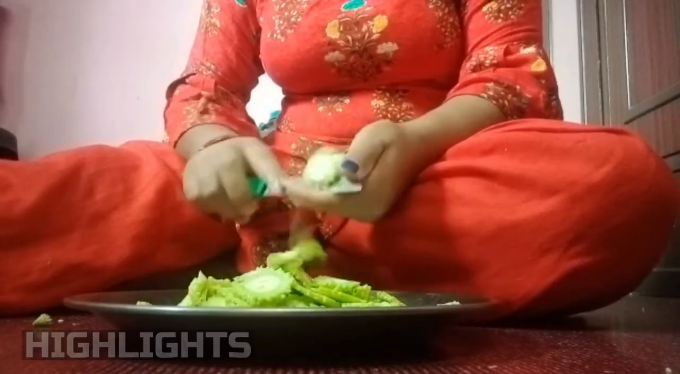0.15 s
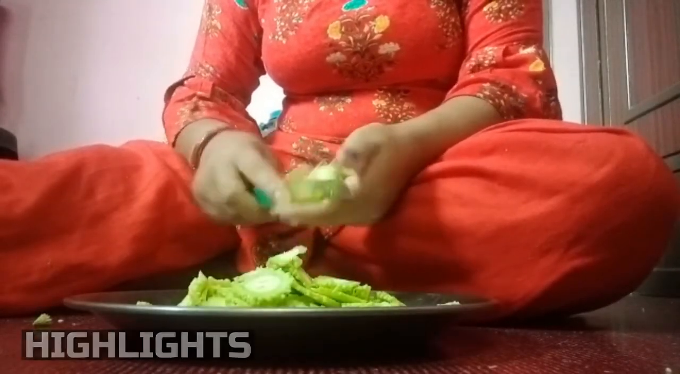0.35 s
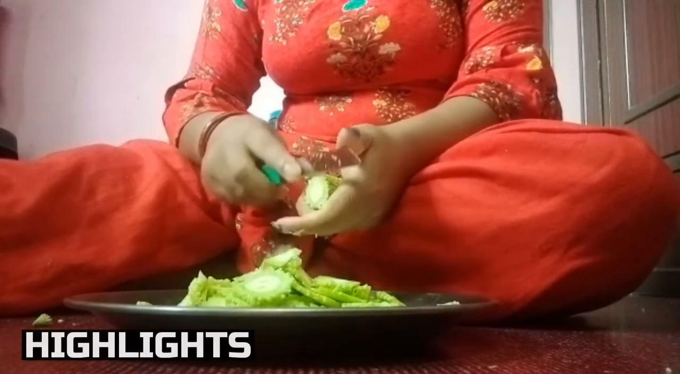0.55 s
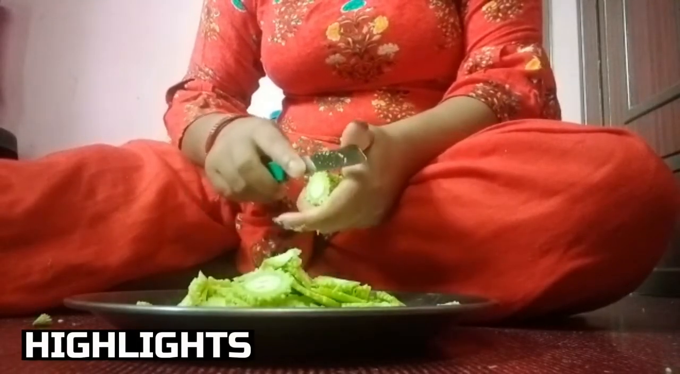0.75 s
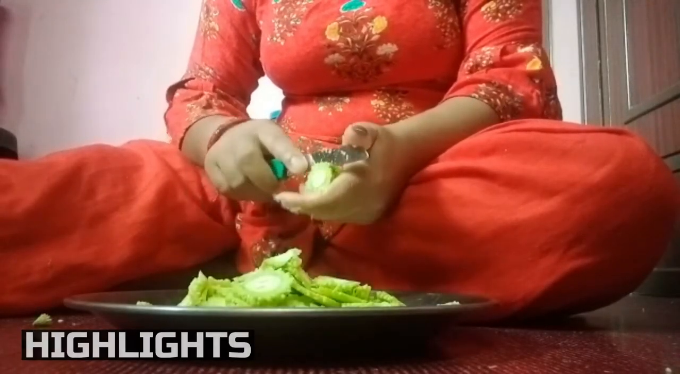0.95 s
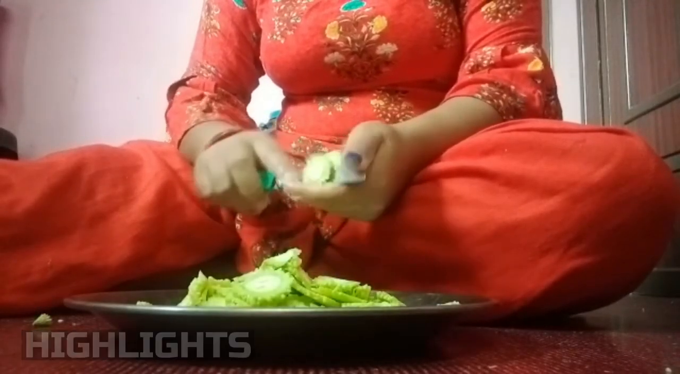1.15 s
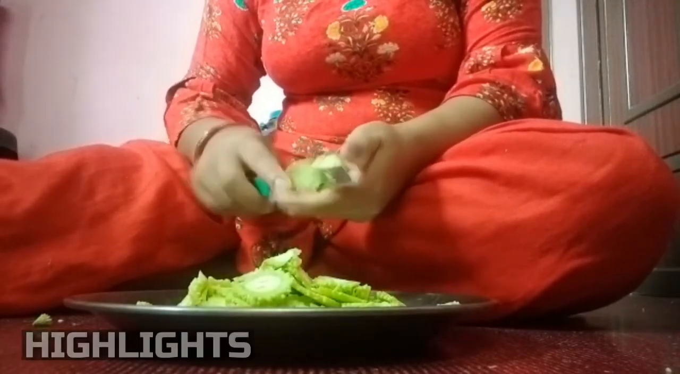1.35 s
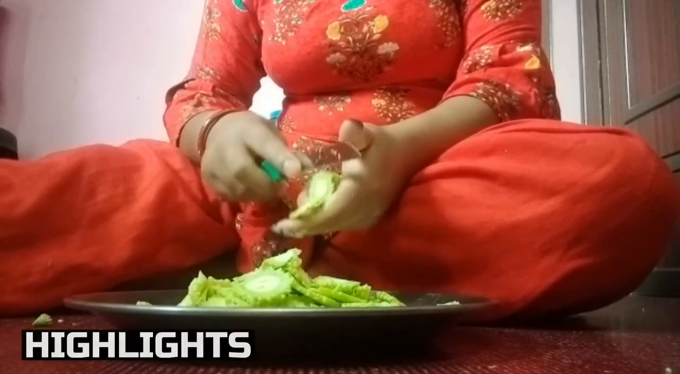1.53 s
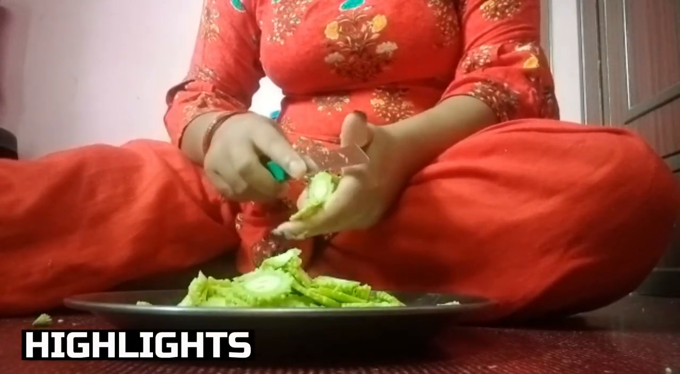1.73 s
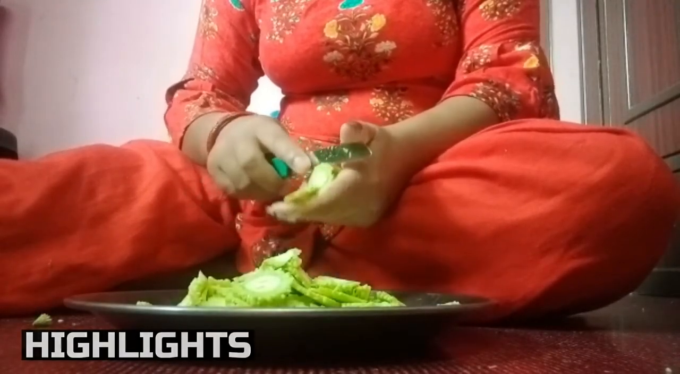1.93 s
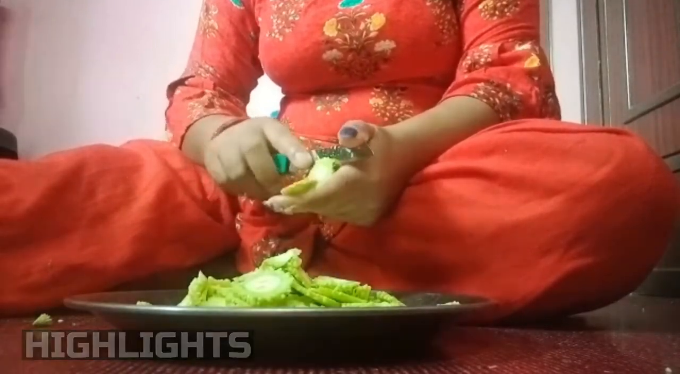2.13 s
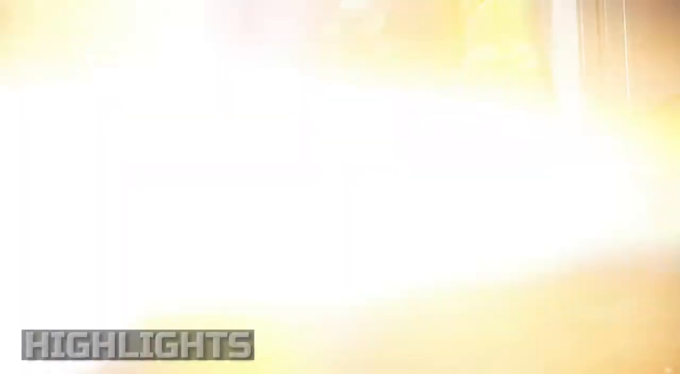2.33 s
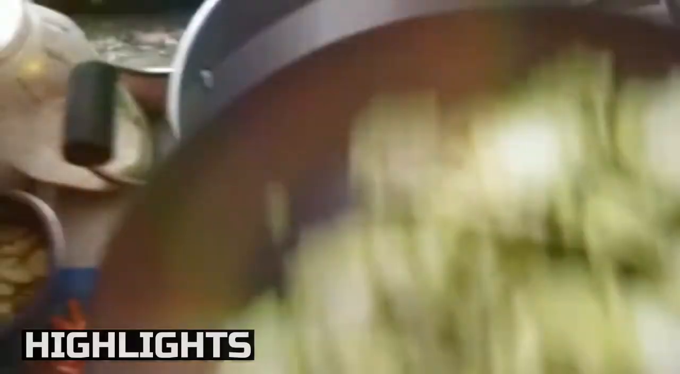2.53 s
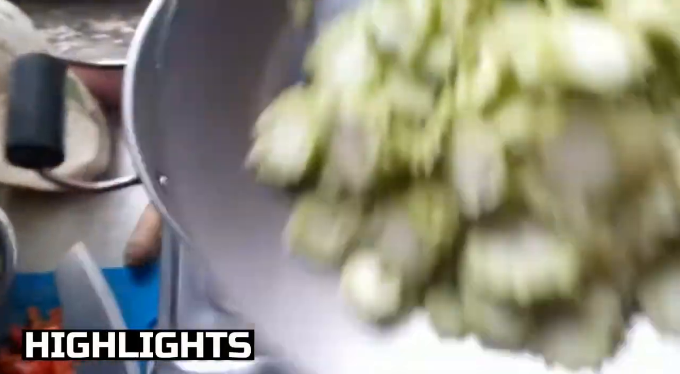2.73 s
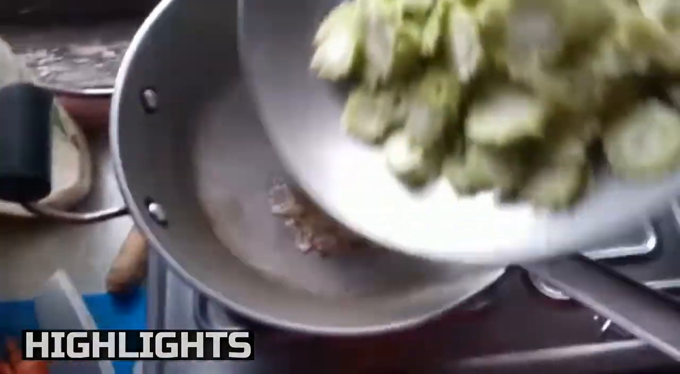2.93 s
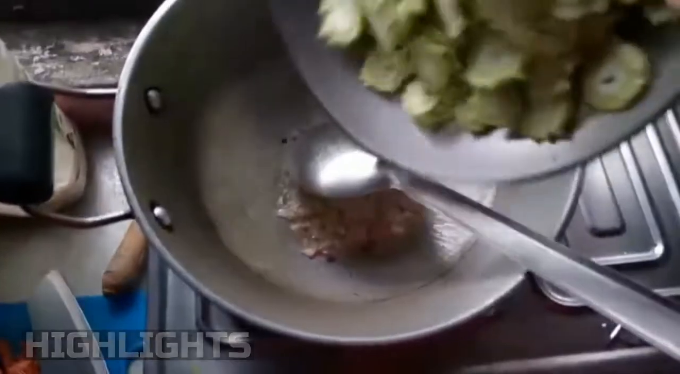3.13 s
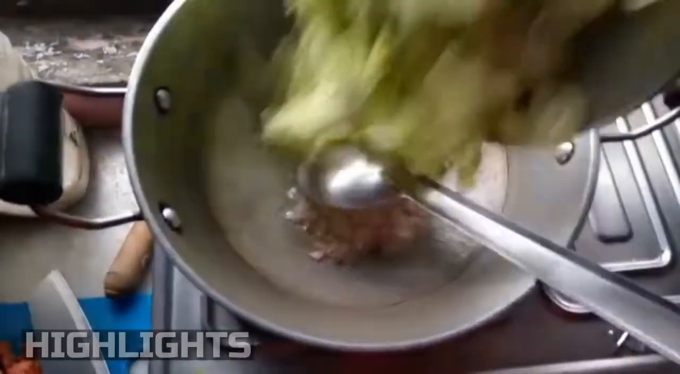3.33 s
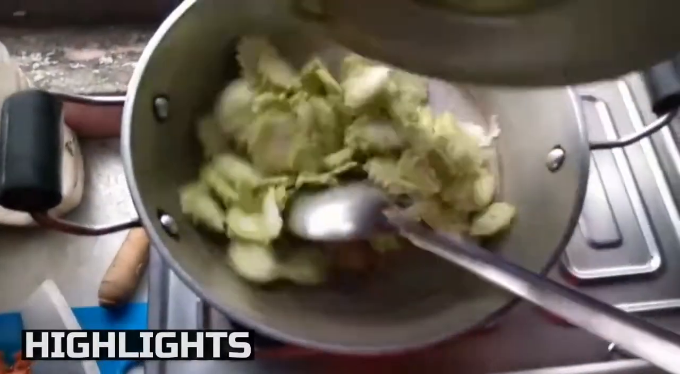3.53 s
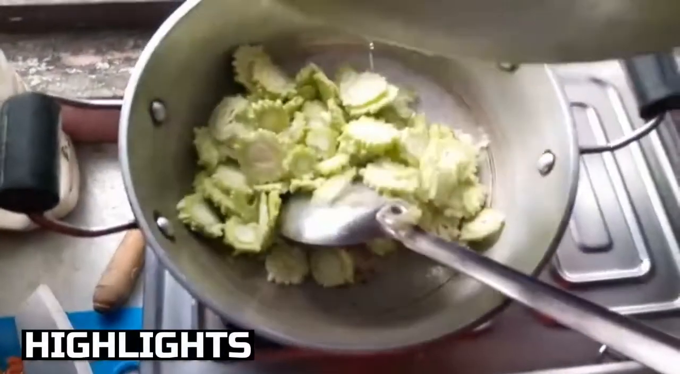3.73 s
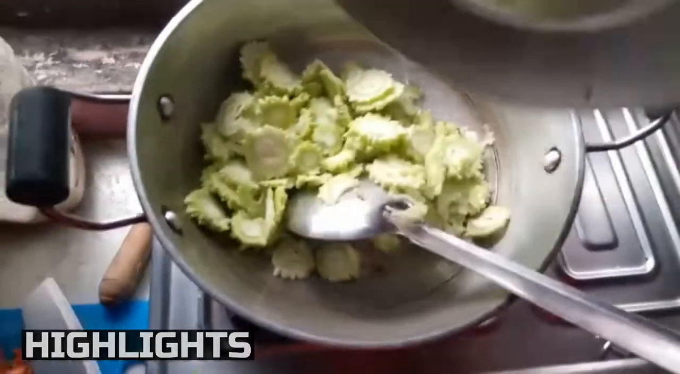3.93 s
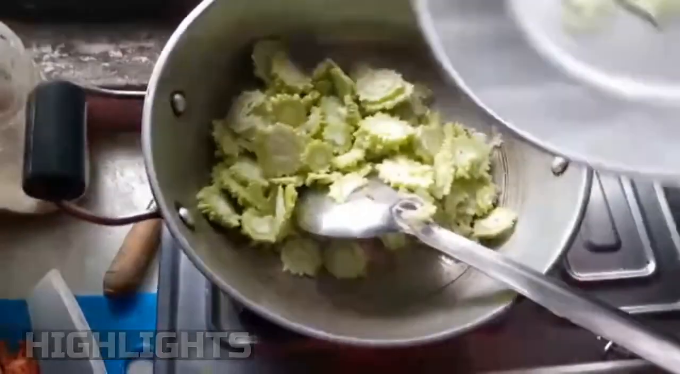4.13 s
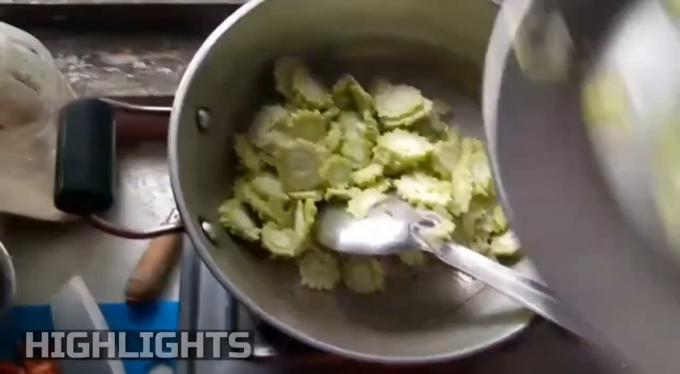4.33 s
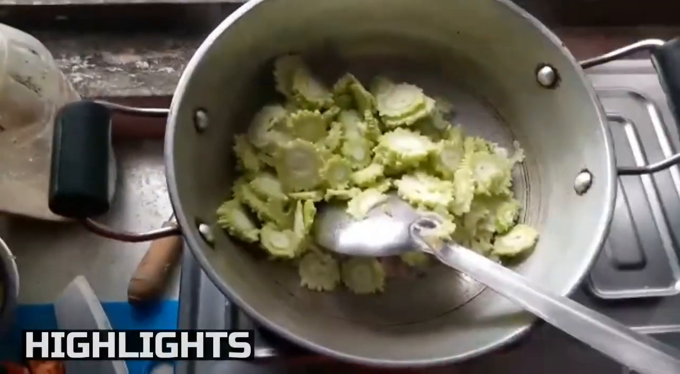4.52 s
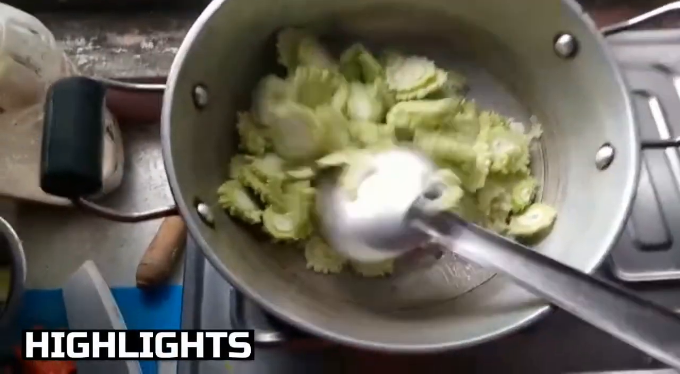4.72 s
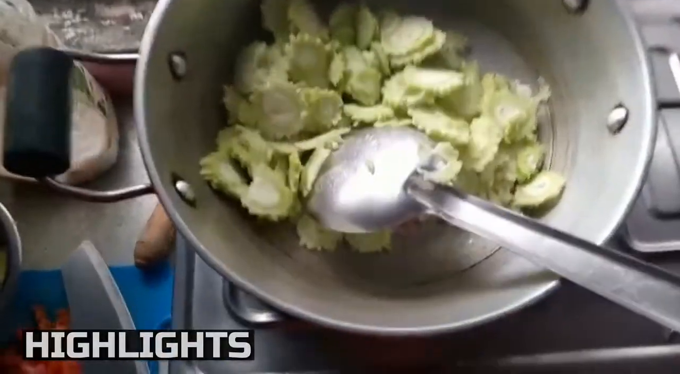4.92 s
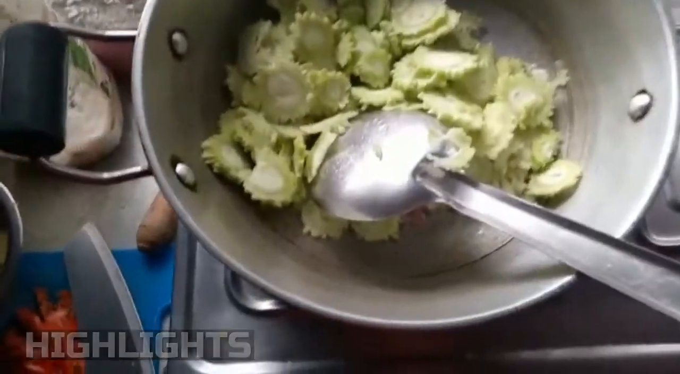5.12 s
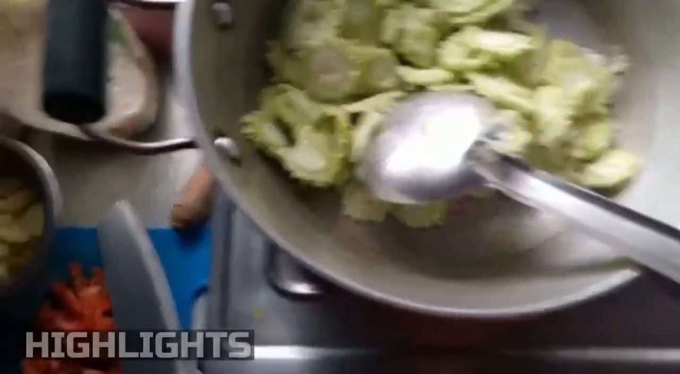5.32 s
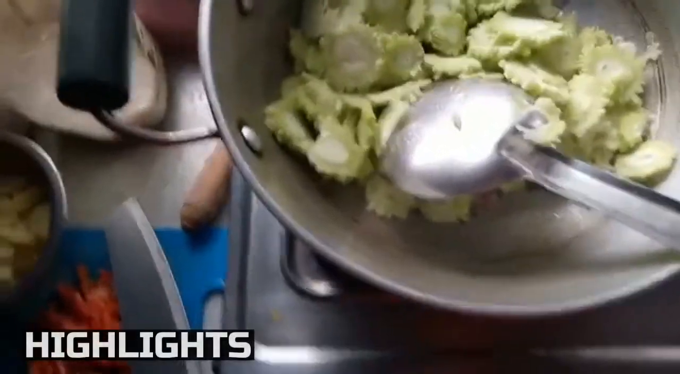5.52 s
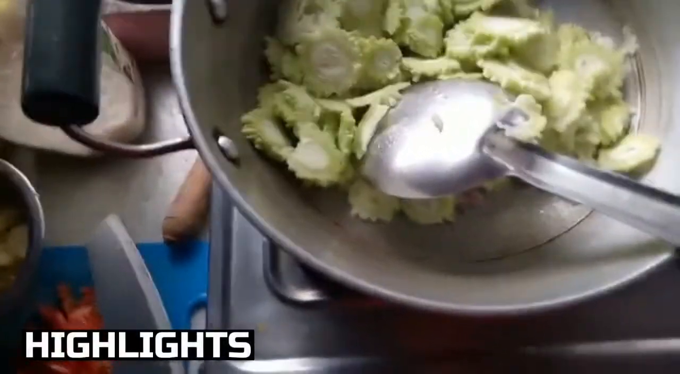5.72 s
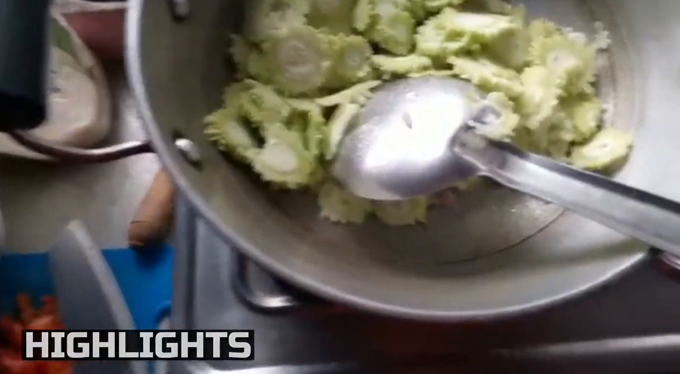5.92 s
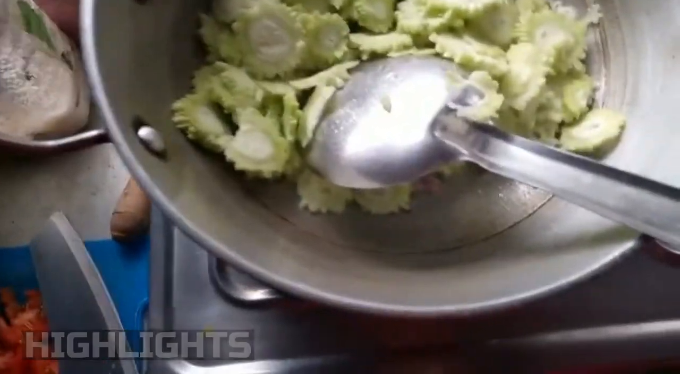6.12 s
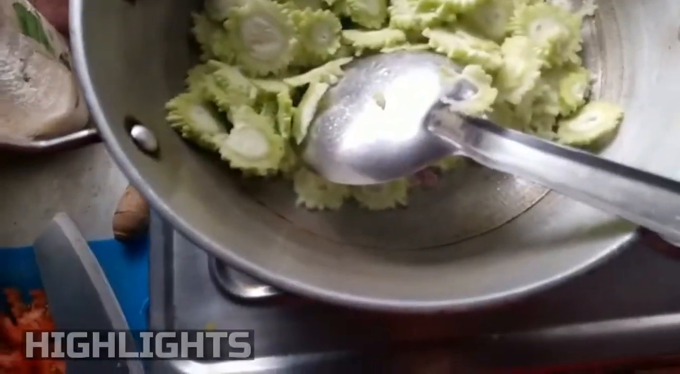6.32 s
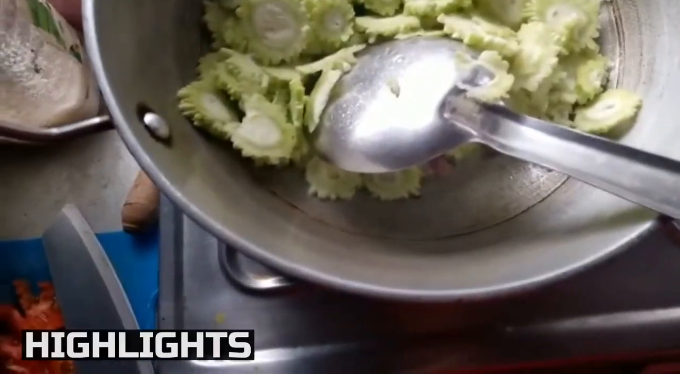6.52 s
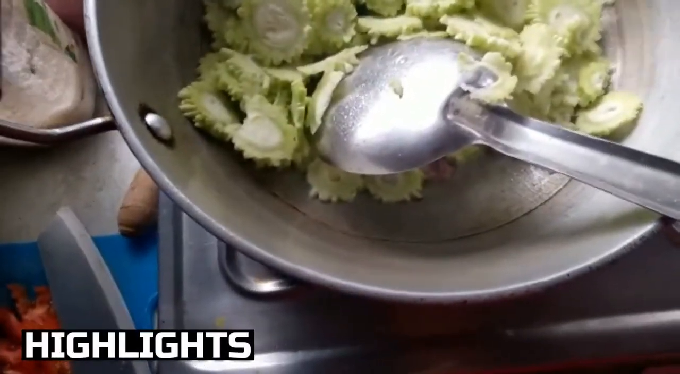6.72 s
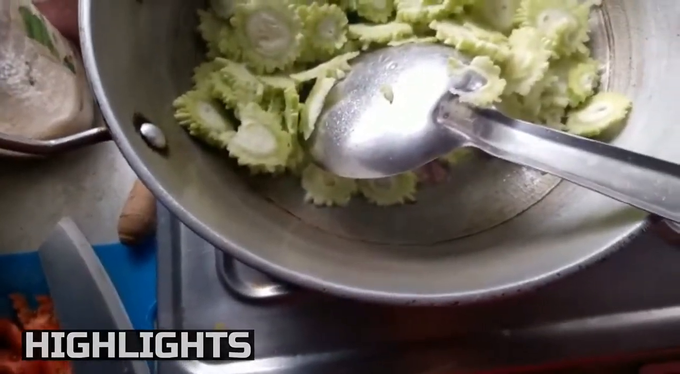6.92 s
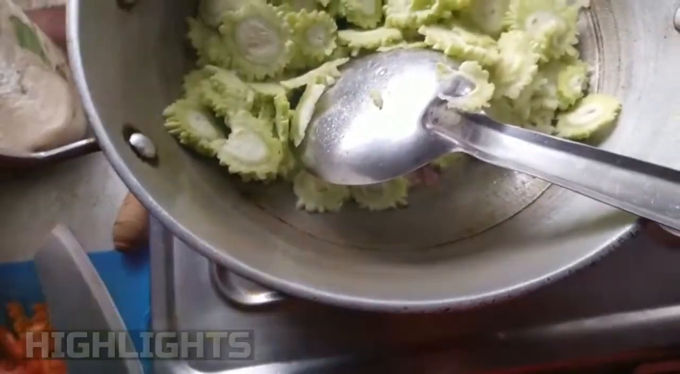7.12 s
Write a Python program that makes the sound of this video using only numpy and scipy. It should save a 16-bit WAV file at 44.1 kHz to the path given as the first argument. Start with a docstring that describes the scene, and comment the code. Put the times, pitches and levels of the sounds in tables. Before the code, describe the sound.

A few small clusters of crisp snaps come from a knife slicing a firm vegetable against low room tone. Then hot oil crackles gently, close to the microphone in a kitchen. After a bright clatter of steel on steel, wet slices land in the pan and burst into loud, fizzing frying. The sizzle surges and pops to the end, joined by dull spoon taps, a brief metal squeak and a few low thumps of the pan.

```python
"""Crisp crunches in a quiet room: a knife fractures the cells of a gourd held in the hand, over a faint
hiss. Then, close over a metal pan, oil simmers and spits round a little seasoning. A plate clashes on
the spoon and tips the wet slices in; their water boils, and bursting steam bubbles make a loud,
spurting sizzle. The spoon taps and pushes the slices about, and the pan bumps on the stove,
each blow exciting the damped modes of the metal."""
import sys
import numpy as np
from scipy import signal
from scipy.fft import rfft, irfft
from scipy.io import wavfile
from scipy.ndimage import uniform_filter1d, minimum_filter1d

SR = 44100
rng = np.random.default_rng(int(sys.argv[2]) if len(sys.argv) > 2 else 0)


def put_to_file(sound):
    """Save the sound as 16-bit audio at rate SR, in the file named by the first command-line argument."""
    columns = np.atleast_2d(sound).T  # one column per channel
    safe = np.clip(columns, -1, 1)
    whole_steps = np.round(safe * 32767)
    wavfile.write(sys.argv[1], SR, whole_steps.astype(np.int16))


N = 315756
TIME = np.arange(N) / SR
PAN_FROM_S, SLICES_IN_S = 2.166, 3.465

# Levels are relative within each table; t60 is the time to decay by 60 dB.
# spectrum of the quiet room: f/Hz, level/dB
ROOM_SPECTRUM = [(25, -18), (50, -17), (72, 0), (130, -7.5), (178, 1.5), (235, -8.5), (335, 5),
                 (430, -13.5), (560, -10), (750, -22.5), (1500, -26.5), (3500, -33), (14000, -40)]
# course of the faint hiss and its whistle: t/s, level/dB, f/Hz
HISS_CURVE = [(0.3, -58, 4630), (0.49, -61.5, 4480), (0.54, -55, 5640), (0.7, -60.5, 5230),
              (0.9, -56.5, 5520), (1.35, -72, 5470), (1.7, -68.5, 5630), (2.1, -68, 5400)]
# spectrum of the hiss: f/Hz, level/dB
HISS_SPECTRUM = [(3800, -33), (5200, 6), (7000, -0.5), (9200, 7.5), (11500, -2), (13500, -8), (15200, -5)]
# spectrum of oil round the seasoning: f/Hz, level/dB
SIMMER_SPECTRUM = [(180, -55), (300, -7), (500, -10), (708, -5.5), (1030, -14.5), (1420, -8.5),
                   (2930, -5.5), (6460, -2), (9760, -6), (13600, -13), (15500, -8.5)]

# the pan scraping as it shifts under its load: t/s, level/dB, length/s
PAN_SHIFTS = [(2.17, -53, .6), (3.25, -42.5, 0.25), (3.46, -45, 0.23), (5.43, -40, 0.24), (5.73, -39, 0.16),
              (6.35, -45, .12), (6.52, -51, .09), (7.08, -45, .15)]
# spectrum of the scrapes: f/Hz, level/dB
SHIFT_SPECTRUM = [(35, -10), (70, -15), (130, 0), (170, 1.5), (220, -14), (330, 0), (470, -10), (800, -21),
                  (2000, -48)]
# food landing or shoved by the spoon: t/s, level/dB, length/s
FOOD_SHOVES = [(2.52, -43.5, 0.11), (3.25, -38.5, 0.19), (4.22, -43, 0.2), (4.77, -33.5, 0.087),
               (4.85, -39.5, 0.17)]
# spectrum of the shoved food: f/Hz, level/dB
SHOVE_SPECTRUM = [(70, -24), (150, 4.5), (220, 1), (300, 6), (470, 5), (720, -3.5), (1100, -2.5),
                  (2500, -29)]
# wet slices slapping into the pan: t/s, level/dB, length/s
WET_SLAPS = [(3.228, -27.5, 0.026), (3.26, -35.5, .2), (3.47, -31.5, 0.066)]
# the pan bumping on the stove, harder with a higher cutoff: t/s, level/dB, cutoff f/Hz
PAN_BUMPS = [(3.229, -26.5, 604), (4.770, -26, 710), (5.411, -8.5, 335), (5.431, -33, 160),
             (5.484, -17, 200), (5.722, -17.5, 497), (5.782, -38, 250), (6.517, -19, 90), (6.543, -28, 110)]
# modes of the pan on the stove top: f/Hz, level/dB, t60/s
STOVE_MODES = [(90, -20, 0.053), (116.7, -7.5, 0.23), (131.4, -12.5, 0.53), (150, -9.5, 0.077),
               (240, 3, 0.037), (291.8, -7.5, 0.37), (335, -11, 0.33), (578, 2, 0.051), (737, -2.5, 0.24)]

# dull taps of the spoon in the pan: t/s, level/dB
SPOON_TAPS = [(2.54, -15), (3.131, -19), (3.227, -16), (4.772, -15), (4.901, -21), (4.996, -12),
              (5.041, -16), (5.143, -16), (5.206, -15), (5.831, -11), (6.326, -10), (6.56, -7),
              (6.614, -13), (6.913, -11), (7.082, -15), (7.126, -7)]
# modes of the tapped pan: f/Hz, level/dB, t60/s
PAN_MODES = [(494, -14.5, 0.013), (723, -7.5, 0.026), (915, -6, 0.011), (1143, -0.5, 0.0073),
             (1326, 0, 0.011), (1795, -6.5, 0.02), (2180, -13.5, 0.022), (3330, -6, 0.0077),
             (4350, -11, 0.022)]
# steel clashing and skidding on steel: t/s, level/dB, length/s
STEEL_CLASHES = [(3.132, -12.5, 0.0011), (3.1825, -16, 0.0012), (3.191, -3, 0.0016), (3.228, -7, 0.0086),
                 (3.243, -11, 0.0083), (3.259, -6.5, 0.027), (3.275, -21.5, 0.031), (3.31, -32.5, 0.087),
                 (4.794, -6, 0.0085)]
# resonances of the plate and spoon: f/Hz, bandwidth/Hz, level/dB
STEEL_RESONANCES = [(2300, 33, -13), (2470, 25, -16), (3470, 55, -13), (4050, 33, -12), (4330, 110, -15),
                    (4730, 30, 0), (5370, 25, -7), (5690, 24, -6), (6300, 130, -14), (6640, 24, -9),
                    (6820, 45, -5), (7260, 44, -4), (7940, 38, -13), (8530, 37, -7), (8930, 31, -9),
                    (9550, 61, -17), (9860, 43, -9), (10100, 54, -6), (10800, 110, -13), (11000, 28, -18),
                    (11200, 30, -17), (11800, 46, -12)]
# squeaks of the sliding spoon: t/s, level/dB, length/s, f/Hz
SPOON_SQUEAKS = [(3.336, -27.5, 0.078, 3460), (3.381, -21, 0.018, 3350), (4.787, -14, 0.025, 3840),
                 (4.81, -31.5, .03, 3350)]

# the knife snapping through the gourd: t/s, level/dB, length/s
KNIFE_SNAPS = [(0.0014, -27, 0.0094), (0.024, -28, 0.0098), (0.1223, -22, 0.018), (0.159, -21.5, 0.0067),
               (0.2158, -16.5, 0.0068), (0.2247, -13.5, 0.0067), (1.01, -26, 0.0092), (1.0504, -27, 0.014),
               (1.19, -18, 0.014), (1.2473, -22.5, 0.016), (1.2605, -23, 0.015), (2.086, -34, 0.0064),
               (2.117, -31, 0.016)]
# the blade creeping through soft flesh: t/s, level/dB, length/s
KNIFE_CREEPS = [(0.05, -39, .025), (0.195, -31, 0.012), (0.25, -31, 0.029), (0.56, -49, 0.067),
                (0.79, -48, 0.046), (1.08, -49, 0.1), (1.22, -34, .02), (1.28, -48, .025),
                (1.92, -53, 0.084), (2.06, -43, .05)]
# spectrum of breaking cells: f/Hz, level/dB
CRUNCH_SPECTRUM = [(410, -47), (720, -24), (1220, -3.5), (1480, -13.5), (1700, -8.5), (2370, -10.5),
                   (2950, -7.5), (3920, -4), (5400, -6.5), (6340, -3.5), (9500, -6), (13400, -20),
                   (15000, -10), (16000, -28)]
# cavity resonances of the cupped hand: f/Hz, bandwidth/Hz, level/dB
HAND_RESONANCES = [(1270, 200, 5), (2300, 280, 10.5), (3550, 150, 5), (4650, 150, 4), (6160, 200, 7),
                   (6700, 88, 4)]

# single drops bursting in the oil, and at 3.1916 s a further ring under the steel tick of the plate: t/s, ring
# level/dB, f/Hz, snap level/dB
OIL_SPITS = [(2.2094, -8.5, 5340, -40), (2.2608, -6.5, 3570, -22.5), (2.3311, -10.5, 3440, -37),
             (2.3958, -12, 4400, -38), (2.4734, -15.5, 2230, -24), (2.5134, -27, 6600, -26),
             (2.7775, -21, 5130, -26), (3.162, -15, 6200, -32), (3.1916, -16, 6200, -26),
             (3.4391, -13, 4750, -30), (3.4425, -6.5, 5130, -28), (3.457, 3, 4930, -19.5),
             (3.88, -2, 3900, -23), (4.21, 0.5, 4710, -30), (4.6468, 5.5, 6660, -23),
             (4.7315, 2, 3350, -35), (4.903, -4, 4470, -20), (4.998, -3.5, 4770, -32),
             (5.024, -3, 3980, -20), (5.109, -6, 6660, -21.5), (5.544, -0.5, 3900, -24),
             (5.745, -7, 6100, -25), (5.9544, 2.5, 6500, -23), (6.058, -2.5, 4800, -25),
             (6.6154, -3.5, 6540, -23.5), (6.713, -4, 5560, -29), (6.847, 6, 4250, -26)]
# spectrum of the frying oil: f/Hz, level/dB
OIL_SPECTRUM = [(200, -31), (400, -15), (600, -9.5), (760, -6), (900, -10), (1400, -6), (2000, -4.5),
                (2800, -5), (3500, 1), (6500, 0.5), (7900, -5), (9200, -0.5), (11000, -2.5), (13600, -11.5),
                (15000, -3), (15800, -13)]
# resonances of the pan's bowl, negative for a notch: f/Hz, bandwidth/Hz, level/dB
BOWL_RESONANCES = [(712, 130, 3.5), (1020, 80, 1), (2170, 240, 3), (4730, 60, 1.5), (6590, 150, 1.5),
                   (7950, 600, -1), (9060, 200, 2)]
# vigour of the frying once the slices are in: t/s, level/dB
FRYING_VIGOUR = [(3.48, -18.5), (3.68, -11.7), (4.2, -16), (4.42, -10.5), (5.1, -18), (5.8, -19),
                 (6.25, -15.5), (6.55, -18.5), (7.16, -13.5)]
# pockets of steam escaping: t/s at the crest, added level/dB, length/s
STEAM_SPURTS = [(4.15, -0.5, 0.15), (4.37, 3, 0.1), (4.71, -2, 0.034), (4.8, 3.5, 0.066), (4.995, 8, 0.024),
                (5.22, 2.5, 0.083), (5.35, 7.5, 0.073), (5.44, 5, 0.054), (5.59, 4, 0.075),
                (5.69, 3.5, 0.073), (5.83, 1, 0.08), (5.92, 2, 0.069), (6.05, 2.5, 0.032),
                (6.18, 7.5, 0.083), (6.29, 4, 0.085), (6.41, 3, 0.073), (6.56, 5.5, 0.026),
                (6.74, 5, 0.045), (6.82, 1, 0.074), (6.93, -1.5, 0.041), (7.09, 2.5, 0.1)]


def from_db(db):
    return 10 ** (np.asarray(db) / 20)


def rms_one(x):
    return x / np.sqrt(np.mean(x ** 2) + 1e-20)


def in_time(rows):
    """Linear interpolation of a curve's columns at every sample."""
    s, *columns = np.transpose(rows)
    return [np.interp(TIME, s, c) for c in columns]


def fade_in(start, length):
    """A linear ramp from 0 to 1."""
    return np.clip((TIME - start) / length, 0, 1)


def drift(per_s):
    """A random fluctuation of unit RMS."""
    knots = rng.standard_normal(4096)
    return rms_one(np.interp(TIME * per_s, np.arange(len(knots)), knots))


def band(x, low_hz, high_hz):
    """A band-pass filter."""
    return signal.sosfilt(signal.butter(2, [low_hz, high_hz], "band", fs=SR, output="sos"), x + 1e-18)


def resonate(x, hz, width_hz):
    """A damped resonator with unit gain at its peak."""
    r = np.exp(-np.pi * width_hz / SR)
    feedback = [1, -2 * r * np.cos(2 * np.pi * hz / SR), r * r]
    return signal.lfilter(np.array([1, 0, -1]) * (1 - r * r) / 2, feedback, x + 1e-18)


def emphasise(x, peaks):
    """Resonances and notches in cascade."""
    for hz, width_hz, db in peaks:
        x = x + (from_db(db) - 1) * resonate(x, hz, width_hz)
    return x


def ring(force, modes):
    """Modal superposition: an impulse excites one decaying sinusoid per mode."""
    out = 0
    for k, (hz, db, t60) in enumerate(modes):
        r, w = np.exp(-np.log(1000) / (t60 * SR)), 2 * np.pi * hz / SR
        mode = signal.lfilter([0, np.sin(w)], [1, -2 * r * np.cos(w), r * r], force + 1e-18)
        out = out + (-1) ** k * from_db(db) * mode
    return out


def colour(x, spectrum, size=8192):
    """A minimum-phase filter: clicks stay sharp and white noise keeps its power."""
    hz, db = np.transpose(spectrum)
    bins_hz = np.linspace(1, SR / 2, size // 2 + 1)
    gain = rms_one(from_db(np.interp(np.log(bins_hz), np.log(hz), db)))
    cepstrum = irfft(np.log(gain))[:size // 2]
    cepstrum[1:] *= 2
    return signal.oaconvolve(x, irfft(np.exp(rfft(cepstrum, size))))[:N]


def grains(per_s, spread_db):
    """Shot noise: clicks at random moments, many small and a few large."""
    sizes = from_db(spread_db * np.minimum(rng.exponential(1, N), 7.03)) * rng.choice([-1, 1], N)
    return rms_one(sizes * (rng.random(N) < per_s / SR))


def bursts(rows, rise_s=0.00042):
    """Transient envelopes: each rises quickly and has fallen to half after its length."""
    out = np.zeros(N)
    for s, db, length in rows:
        age = np.maximum(TIME - s, 0)
        out += from_db(db) * np.minimum(age / rise_s, 1) / (1 + (age / length) ** 4)
    return out


def swells(rows):
    """A bell-shaped rise in dB round each event."""
    return sum(db * np.exp(-np.square(2 * (TIME - s) / length)) for s, db, length in rows)


def blow(s, db, size=2048):
    """An impulse and the span of samples it falls in."""
    start = int(np.clip(s * SR, 0, N - size))
    return from_db(db) * signal.unit_impulse(size), slice(start, start + size)


def room(x, t60, wet_db):
    """Reverberation: a diffuse, exponentially decaying tail follows the direct sound."""
    age = TIME[:SR]
    tail = rng.standard_normal(SR) * np.exp(-np.log(1000) * age / t60) * (age > .004)
    return x + from_db(wet_db) * signal.oaconvolve(x, tail / np.linalg.norm(tail))[:N]


def room_tone():
    """Ambient noise, mostly bass, with a slight random amplitude modulation."""
    return from_db(-52.5) * colour(rng.standard_normal(N), ROOM_SPECTRUM) * from_db(drift(per_s=10.64))


def rumble():
    """Low band-limited noise wavers in the background at the stove."""
    return rms_one(band(rng.standard_normal(N), 56, 286)) * from_db(-55 + 5.5 * drift(per_s=8))


def thin_hiss():
    """Narrow-band noise is heard as a wandering whistle within an airy, uneven hiss."""
    db, hz = in_time(HISS_CURVE)
    carrier = np.cos(2 * np.pi * np.cumsum(hz) / SR)
    whistle = rms_one(band(rng.standard_normal(N), 23, 140) * carrier)
    air = colour(rng.standard_normal(N), HISS_SPECTRUM) * fade_in(0.5, .03)
    return from_db(db + 1.9 * drift(per_s=40)) * (from_db(-4.5) * whistle + from_db(1.8) * air)


def crackle(per_s, spread_db, pitches=10):
    """Bursting steam bubbles ring as heavily damped resonators; a third are broadband snaps."""
    clicks = grains(per_s, spread_db)
    kind = rng.integers(0, pitches + pitches // 2, N)
    bubble_hz = np.geomspace(1100, 14000, pitches)
    rings = sum(resonate(clicks * (kind == k), hz, .5 * hz) for k, hz in enumerate(bubble_hz))
    snaps = clicks * (kind >= pitches)
    return rms_one(rms_one(rings) + from_db(-5) * rms_one(snaps))


def simmer(fade_db_per_s=2):
    """Evaporation round the seasoning: a light crackle fades as it dries, until the slices smother it."""
    db = -32 - fade_db_per_s * (TIME - PAN_FROM_S) + 1.5 * drift(per_s=25.43)
    pops = crackle(per_s=9000, spread_db=2.5) + from_db(-2) * rng.standard_normal(N)
    uncovered = 1 - fade_in(SLICES_IN_S, 0.067)
    return colour(pops * from_db(db) * uncovered, SIMMER_SPECTRUM)


def tumble():
    """Friction and soft impacts: the shifting pan scrapes, and wet slices flop and slap into it."""
    scrapes = colour(grains(per_s=3000, spread_db=3) * bursts(PAN_SHIFTS), SHIFT_SPECTRUM)
    flops = colour(grains(per_s=2500, spread_db=1.5) * bursts(FOOD_SHOVES), SHOVE_SPECTRUM)
    slaps = rms_one(band(grains(per_s=1500, spread_db=3.5), 640, 2830)) * bursts(WET_SLAPS)
    return scrapes + flops + slaps


def bumps():
    """A soft impact is a low-passed force: it drives the booming modes of the pan and stove top."""
    force = np.zeros(N)
    for s, db, cutoff_hz in PAN_BUMPS:
        click, when = blow(s, db)
        force[when] += signal.sosfilt(signal.butter(2, cutoff_hz, fs=SR, output="sos"), click)
    return ring(force, STOVE_MODES)


def spoon():
    """Impact and friction excite steel: taps damped by food, chattering bare clashes, and squeaks."""
    taps = np.zeros(N)
    for s, db in SPOON_TAPS:
        click, when = blow(s, db)
        taps[when] += click
    knocks = from_db(0.5) * ring(taps, PAN_MODES)
    chatter = grains(per_s=4500, spread_db=2.5) * bursts(STEEL_CLASHES)
    contact = from_db(-3) * colour(chatter, OIL_SPECTRUM)
    steel = sum((-1) ** k * from_db(db) * resonate(chatter, hz, width_hz)
                for k, (hz, width_hz, db) in enumerate(STEEL_RESONANCES))
    squeaks = sum(bursts([(s, db, length)]) * rms_one(resonate(rng.standard_normal(N), hz, 220))
                  for s, db, length, hz in SPOON_SQUEAKS)
    return knocks + from_db(19.5) * steel + contact + squeaks


def knife():
    """Brittle fracture: each push breaks a run of crisp cells, and the cupped hand resonates."""
    cells = grains(per_s=6900, spread_db=1) * (bursts(KNIFE_SNAPS) + bursts(KNIFE_CREEPS))
    return from_db(-14.5) * emphasise(colour(cells, CRUNCH_SPECTRUM), HAND_RESONANCES)


def spits():
    """Flash boiling: a drop of water bursts in the oil with a brief ring and a bright snap."""
    rings, snaps = np.zeros(N), np.zeros(N)
    for s, ring_db, hz, snap_db in OIL_SPITS:
        click, when = blow(s, 0)
        pop = resonate(resonate(click, hz, 0.6 * hz), hz, 0.6 * hz)
        rings[when] += from_db(ring_db) * pop / np.abs(pop).max()
        snaps[when] += from_db(snap_db) * click
    bright = band(snaps, 5400, 16400)   # so small a burst radiates little bass
    return colour(from_db(1) * rings + from_db(32.5) * bright, OIL_SPECTRUM)


def sizzle():
    """Boiling in hot oil: the wet slices fizz at first, then crackle as steam escapes in spurts."""
    vigour_db = in_time(FRYING_VIGOUR)[0] + swells(STEAM_SPURTS)
    wetness = 1 - fade_in(start=4.14, length=1)   # the surface water boils off
    flutter_db = (1.25 * (1 - wetness) + 0.5 * wetness) * drift(per_s=140)
    pops = crackle(per_s=10000, spread_db=2.9) * from_db(-2.5 * wetness)
    fizz = from_db(-9 + 3.5 * wetness) * rng.standard_normal(N)
    spray = from_db(-1.5) * wetness * band(rng.standard_normal(N), 6900, 17000)   # the finest bubbles
    steam = (pops + fizz + spray) * from_db(vigour_db + flutter_db - 0.7)
    # dull bubbles under the slices grow faster with vigour than the steam does
    big_bubbles = band(grains(per_s=1800, spread_db=9.5), 880, 1550) * from_db(-3 + 1.48 * vigour_db)
    return colour((steam + big_bubbles) * fade_in(SLICES_IN_S, 0.021), OIL_SPECTRUM)


def scene():
    """Superposition of the sources in two scenes: first the slicing, then the pan."""
    quiet = room_tone()
    slicing = room(knife(), t60=0.26, wet_db=-7.5) + thin_hiss() + quiet
    bare_pan = emphasise(simmer(), BOWL_RESONANCES[:3])   # the bowl rings more while nearly empty
    oil = emphasise(bare_pan + sizzle() + spits(), BOWL_RESONANCES)
    pan = room(oil + spoon(), t60=.3, wet_db=-10)
    stove = room(bumps(), t60=.3, wet_db=-9)
    frying = pan + stove + tumble() + rumble()
    at_pan = fade_in(PAN_FROM_S - .002, .004)
    return ((1 - at_pan) * slicing + at_pan * frying)[None]


def record(dry, release_db_per_s=158, cutoff_hz=15550):
    """Peak limiting: the loudest pops briefly duck the sizzle; a low-pass then cuts the top treble."""
    over_db = 20 * np.log10(np.maximum(np.abs(dry), 1))
    recovery_db = release_db_per_s * TIME
    held_db = np.maximum.accumulate(over_db + recovery_db, axis=-1) - recovery_db
    gain = uniform_filter1d(minimum_filter1d(from_db(-held_db), size=33), size=33)
    return signal.sosfilt(signal.ellip(12, .2, 70, cutoff_hz, fs=SR, output="sos"), dry * gain)


dry = scene()
out = record(dry)
put_to_file(out)
```